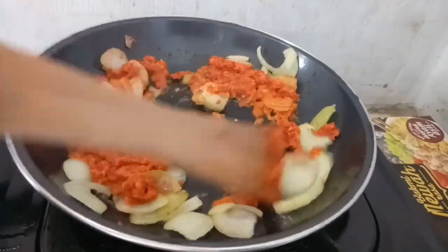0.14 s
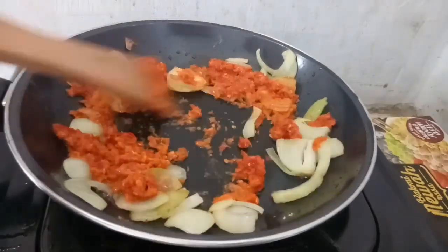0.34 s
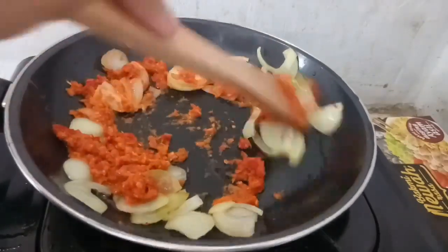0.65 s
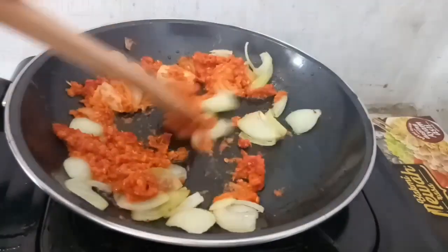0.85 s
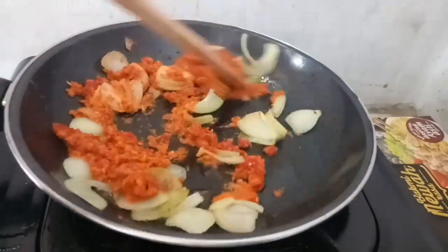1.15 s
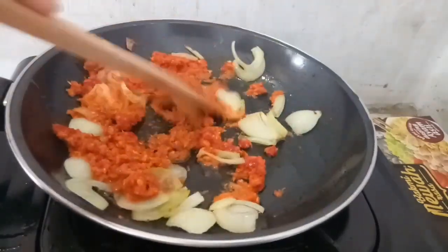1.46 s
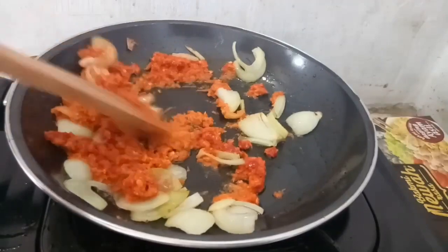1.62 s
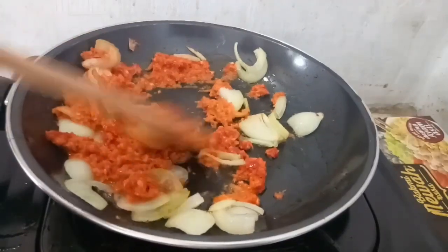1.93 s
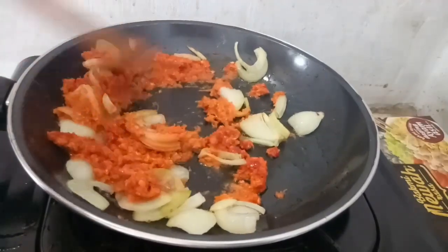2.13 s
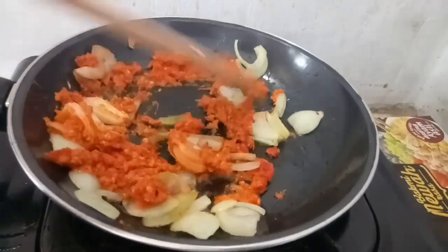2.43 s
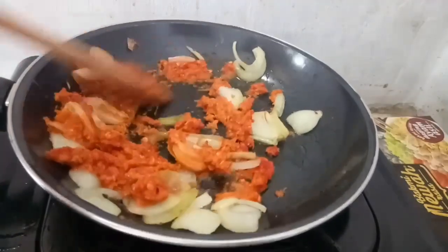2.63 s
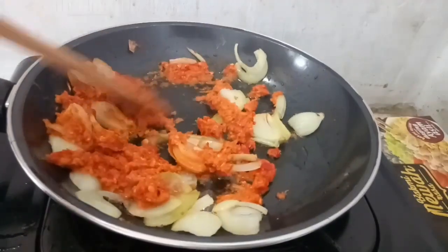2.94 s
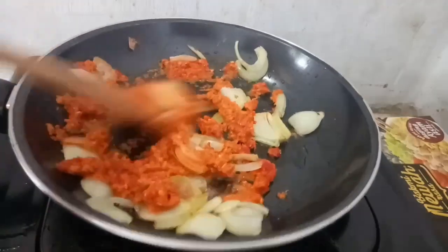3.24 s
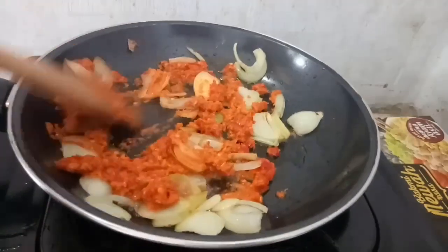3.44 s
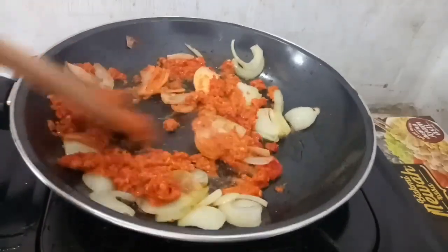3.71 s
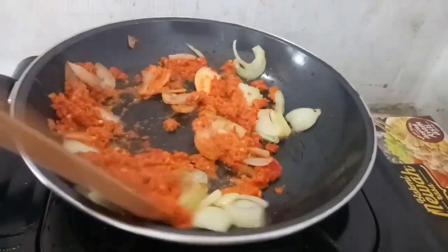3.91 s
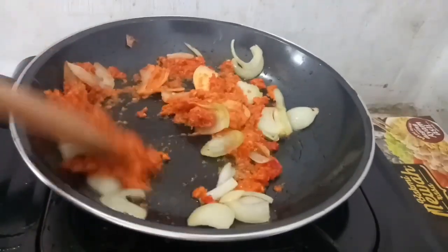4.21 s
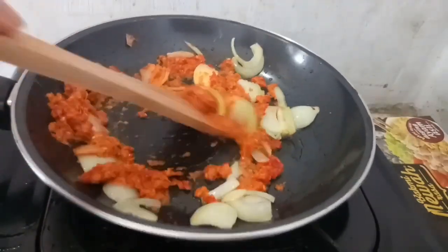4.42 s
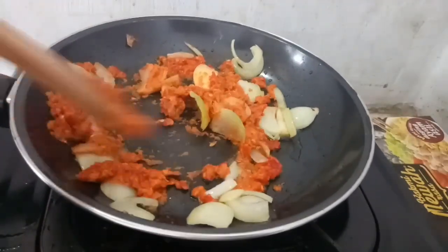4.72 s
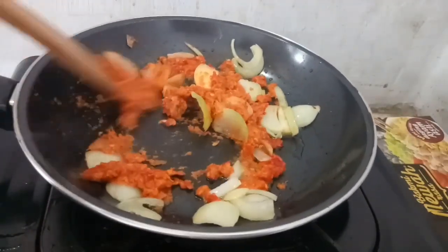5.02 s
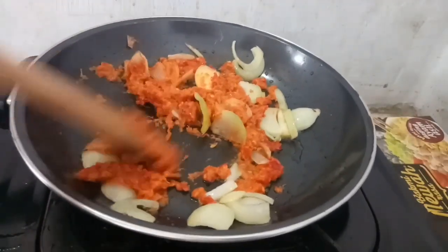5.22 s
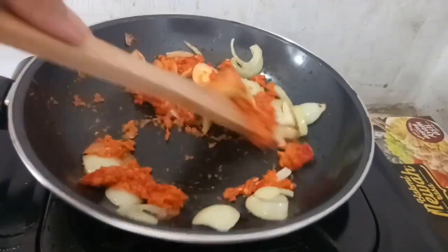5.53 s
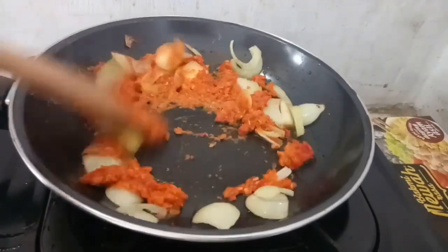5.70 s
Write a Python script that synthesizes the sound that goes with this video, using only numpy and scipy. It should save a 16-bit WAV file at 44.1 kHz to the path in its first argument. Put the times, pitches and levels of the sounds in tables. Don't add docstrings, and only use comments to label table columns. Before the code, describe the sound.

Close to a phone in a small hard-walled kitchen, a wooden spatula stirs chopped vegetables in a metal pan. Irregular sharp knocks, some with tiny bounces, set the pan chattering with a short damped ring. Wet scrapes fill the gaps over continuous sizzle, spitting oil and low burner roar. The left channel is louder.

```python
import sys
import numpy as np
from scipy import signal
from scipy.fft import rfft, irfft, next_fast_len
from scipy.io import wavfile
from scipy.ndimage import uniform_filter1d

SR = 44100
rng = np.random.default_rng(int(sys.argv[2]) if len(sys.argv) > 2 else 0)


def invert_db(level):
    return 10 ** (np.asarray(level, dtype=float) / 20)


def wrap_up_sound(samples):
    columns = np.atleast_2d(samples).T
    tamed = np.clip(columns, -1, 1)
    steps = np.round(tamed * 32767).astype(np.int16)
    wavfile.write(sys.argv[1], SR, steps)


N = 258426
T = np.arange(N) / SR

# start in seconds, tick peak in dB, tick pitch in Hz,
# pan bottom level in dB, chatter in seconds.
EDGE_BLOWS = [(0.351, -11, 1840, -25.5, 0.039), (0.8235, -10.5, 1830, -27, 0.068),
              (1.2478, -10, 1790, -26.5, 0.072), (2.2377, -22, 1770, -35.5, 0.03),
              (2.6406, -8.5, 1750, -27.5, 0.075), (3.3556, -9.5, 1830, -27.5, 0.07),
              (3.7399, -8.5, 1763, -25.5, 0.065), (4.1267, -10, 1730, -27.5, 0.058),
              (4.5389, -11.5, 1680, -26, 0.054), (5.0742, -13, 1710, -25.5, 0.021),
              (5.6499, -12, 1750, -26.5, 0.054)]
CORNER_BLOWS = [
    (0.2025, -8, 2293, -29.5, 0.073),
    (3.26, -17.5, 2240, -29, 0.0084),
    (3.6586, -21, 2300, -29, 0.003),
    (4.073, -10, 2260, -27.5, 0.06),
    (5.5665, -20, 2260, -34, 0.018),
]
# start in seconds, tick peak in dB, tick pitch in Hz.
BOUNCES = [(0.2484, -26, 1940), (0.3967, -26, 1866), (0.861, -19, 1830), (1.2987, -23, 1830),
           (2.682, -30, 1790), (3.3946, -20, 1830), (3.782, -29, 1740), (3.805, -25, 1830),
           (4.1685, -41, 1750), (5.1, -25, 1670), (5.576, -26, 1960), (5.687, -21.5, 1800),
           (0.214, -23, 2020), (.375, -25, 1860), (.845, -28, 1830), (.885, -25, 1830), (1.272, -24, 1790),
           (1.306, -26, 1830), (1.323, -27.5, 1830), (2.666, -26, 1760), (3.272, -28, 1930),
           (3.37, -26, 1830), (3.415, -22.5, 1830), (3.438, -30, 1830), (3.765, -31, 1750),
           (4.09, -23, 1950), (4.145, -26, 1780), (4.565, -26, 1730), (4.59, -39, 1730), (5.665, -29, 1740),
           (5.705, -31, 1780)]
# start in seconds, peak in dB, pitch in Hz, pan rim level in dB,
# chatter in seconds.
NUDGES = [(0.055, -41.5, 210, -66, 0.012), (0.171, -23.5, 277, -66, 0.053), (0.179, -29, 343, -66, 0.12),
          (0.698, -44.5, 240, -64, 0.017), (2.381, -41, 354, -58, 0.016), (2.454, -33, 227, -64, 0.018),
          (2.621, -26, 347, -53, 0.039), (3.497, -27, 332, -48, 0.017), (4.2306, -20, 576, -41.5, 0.014),
          (5.375, -39.5, 640, -46.5, 0.036), (5.5, -44, 352, -53, 0.028)]
# multiple of the tick pitch, level in dB.
EDGE_WOOD = [(1.004, 4.5), (.6, -11), (1.27, -12.5), (1.6, -8.5), (1.85, -7.5), (2.2, -6.5)]
# multiple of the tick pitch, level in dB.
CORNER_WOOD = [(1, 8), (.52, -6), (.76, -1), (1.27, -2.5), (1.47, -9.5)]
# pitch in Hz, level in dB, decay by 60 dB in seconds.
BOTTOM_MODES = [(235.3, 1.5, 0.52), (275.4, 2, 0.37), (347, 0, 0.19), (407, 5, 0.32), (421.2, -9, 1),
                (469.5, -1.5, 0.21), (576, -0.5, 0.25), (660.5, 1, 0.26), (719, -3, 0.37),
                (790, -17.5, 0.56), (897, -14, 0.63)]
# pitch in Hz, level in dB, decay by 60 dB in seconds.
RIM_MODES = [(1283, -18, 0.22), (1295, 2, 0.062), (1530, 0.5, 0.19), (1673, 4, 0.15), (1690, -24, 0.16),
             (1786, 3.5, 0.046), (1830, -4, 0.16), (1866, 7.5, 0.056), (1950, 3.5, 0.028), (2180, 2, 0.41),
             (2395, 2.5, 0.12), (2877, 1, 0.11), (3340, -2, 0.13), (3600, -26, 0.091)]
# frequency in Hz, level in dB.
CONTACT_COLOUR = [(100, -40), (170, -13), (210, 0), (300, 0), (4300, 0), (6800, -4), (8000, -16),
                  (10000, -36)]

# middle in seconds, half length in seconds,
# slip level in dB, load level in dB.
STROKES = [(0.07, 0.15, -82, -40.5), (0.34, 0.04, -43, -38.5), (0.66, 0.049, -74, -57),
           (1.132, 0.027, -74, -63), (1.452, 0.086, -56, -50), (1.79, 0.16, -71, -46.5),
           (2.01, 0.088, -70, -63), (2.46, 0.07, -43.5, -46), (2.85, 0.12, -43.5, -55),
           (3.015, 0.088, -83, -52.5), (3.273, 0.052, -50, -54), (3.582, 0.1, -51, -51.5),
           (3.66, 0.02, -49, -46), (4.19, 0.28, -51, -53), (4.48, 0.046, -48, -45.5),
           (5.26, 0.18, -47, -58.5), (5.556, 0.034, -39, -48), (5.825, 0.062, -44.5, -51)]
# middle in seconds, half length in seconds,
# change of resting level in dB, further change of the lows in dB.
LIFTS = [
    (0.064, .1, -5.5, -3),
    (.68, 0.08, 3, -1),
    (1.145, .07, 0, -3),
    (2.153, 0.071, 1, -5),
    (3.204, 0.062, 5, -11),
    (4.003, 0.052, -3, 2),
    (4.926, 0.26, 3, -11),
    (5.296, 0.054, -2, 1),
]
# frequency in Hz, level in dB.
SLIP_COLOUR = [(310, -7.5), (520, -0.5), (708, -4), (767, 0), (1020, 1.5), (1330, -14), (2300, -1),
               (3000, -2), (3900, -0.5), (6600, -120)]
# frequency in Hz, level in dB.
DRAG_COLOUR = [(100, -41), (170, -4), (238, -9.5), (296, -22), (351, -10), (467, -25), (650, -22),
               (840, -60), (1430, -120)]

# time in seconds, sizzle level in dB.
HEAT = [(0, -45.5), (.3, -40), (.6, -44), (1.04, -44.5), (1.4, -46.5), (1.8, -44.5), (2.2, -44),
        (2.5, -38.5), (2.8, -42), (3.2, -40), (3.55, -41.5), (4.35, -41.5), (4.65, -41), (5.2, -42.5),
        (5.45, -41.5), (5.53, -34.5), (5.62, -33), (5.7, -43)]
# middle in seconds, rise in dB,
# half width in seconds.
PUFFS = [(.18, 3.5, 0.024), (.36, 7, 0.11), (.77, 7, 0.05), (.93, 3.5, 0.04), (1.19, 6, 0.014),
         (1.389, 6, 0.009), (1.58, 6.5, 0.55), (1.81, -0.5, 0.023), (1.94, 1.5, 0.014), (2.08, -0.5, 0.021),
         (2.75, 1, 0.18), (3.2, 6.5, 0.037), (3.36, 12, 0.0034), (3.45, 1.5, 0.05), (3.69, 9, 0.051),
         (3.83, 5.5, 0.072), (4.18, 9, 0.11), (4.3, 3, 0.041), (4.44, 6.5, 0.086), (4.63, 8, 0.016),
         (4.81, 1, 0.02), (4.96, 1.5, 0.018), (5.2, 1.5, 0.036), (5.34, 6, 0.019), (5.48, 2.5, 0.032),
         (5.6, 1, 0.053), (5.85, 5, 0.12)]
# start in seconds, peak in dB, pitch in Hz.
SPITS = [(0.0064, -33, 4100), (0.13, -33, 3770), (0.184, -27, 3960), (0.6065, -24.5, 3900),
         (0.6659, -33, 4850), (0.773, -26.5, 4000), (0.9508, -29, 4480), (1.0384, -32, 4550),
         (1.38, -30.5, 4000), (1.449, -37, 4300), (1.4658, -33.5, 3940), (1.489, -29.5, 3980),
         (1.534, -28, 3840), (1.552, -36, 4190), (1.6113, -26.5, 4100), (1.6555, -28.5, 3960),
         (1.679, -29.5, 4010), (1.692, -35, 3770), (1.7084, -34, 3920), (1.7548, -38, 3990),
         (1.7943, -37, 4410), (1.8054, -34, 4020), (1.8204, -25.5, 4160), (1.851, -31, 3970),
         (1.9018, -29, 4000), (1.9628, -30, 4130), (2.0342, -29, 4000), (2.0464, -34, 4040),
         (2.0698, -28, 3970), (2.1423, -35, 4030), (2.2532, -20, 3840), (2.398, -31, 3990),
         (2.4764, -34, 4270), (2.4941, -33, 3940), (2.785, -29, 4010), (2.846, -34, 3950),
         (3.1026, -33, 4200), (3.1217, -30.5, 4050), (3.1797, -28, 3390), (3.467, -27, 3800),
         (3.4732, -25, 3180), (3.486, -25.5, 4000), (3.4974, -27, 4110), (3.5787, -30, 3860),
         (3.643, -25, 3960), (4.0525, -25, 4100), (4.282, -26, 4000), (4.3834, -29, 4120),
         (4.4217, -30.5, 4200), (4.6763, -28, 3940), (4.841, -26.5, 4440), (4.9112, -33, 3980),
         (4.9954, -28, 3860), (5.3356, -31, 4070), (5.4589, -30, 4060), (5.481, -26, 4030),
         (5.5192, -27, 4050), (5.7891, -27, 3580), (5.8405, -32, 3920)]
# frequency in Hz, level in dB.
SIZZLE_COLOUR = [(880, -22.5), (1500, -7), (1560, -15), (1910, -7.5), (2350, -7), (2880, -8.5),
                 (3060, -4.5), (3220, -3.5), (3630, -5.5), (3850, -2), (4020, 3), (4250, -2), (4620, -4),
                 (5050, -5), (9000, -33.5), (11700, -45), (19800, -120)]
# frequency in Hz, level in dB.
STEAM_COLOUR = [(3820, -5.5), (6500, 5), (6700, 4), (7890, -6.5), (8820, -8), (15000, -7.5), (15800, -15)]

# time in seconds, flame level in dB.
FLAME = [(0.0, -39.5), (1.83, -43.5), (1.86, -39), (3.23, -44), (3.46, -36.5), (3.65, -47.5), (3.69, -39),
         (3.88, -39.5), (4.06, -57), (4.11, -41.5), (4.55, -48), (4.77, -40), (4.91, -46.5), (5.11, -37),
         (5.34, -50.5), (5.63, -43), (5.83, -48), (5.86, -71)]
# frequency in Hz, level in dB.
BURNER_COLOUR = [(12, -59), (20, -18), (32, -21), (59, -12), (76, -5.5), (94, 3.5), (107, 2.5), (118, 0.5),
                 (141, -6.5), (189, -13.5), (206, -19.5), (230, -16), (300, -28), (510, -120)]
# frequency in Hz, left minus right in dB.
PORTS = [(60, 9.5), (110, 9.5), (200, 11), (380, 9.5), (700, 6.5), (1290, 7.5), (2380, 7.5), (4400, 3.5),
         (8120, 5), (15000, 2.5)]
# frequency in Hz, level in dB.
TOP_CUT = [(15500, 0), (15800, -60)]


def level(x, db):
    return x * invert_db(db) / np.sqrt(np.mean(x ** 2))


def shape(x, table):
    size = next_fast_len(x.shape[-1])
    hz, db = np.transpose(table)
    f = np.maximum(np.fft.rfftfreq(size, 1 / SR), 1)
    gain = invert_db(np.interp(np.log(f), np.log(hz), db))
    return irfft(rfft(x, size) * gain, size)[..., :x.shape[-1]]


def ring(x, hz, t60):
    r = np.exp(-np.log(1000) / (t60 * SR))
    w = 2 * np.pi * hz / SR
    return signal.lfilter([0, np.sin(w)], [1, -2 * r * np.cos(w), r * r], x)


def walk(rate, rows=1):
    k = int(SR / rate)
    held = np.repeat(rng.standard_normal((rows, N // k + 1)), k, axis=1)
    return 1.3 * uniform_filter1d(uniform_filter1d(held, k), k)[:, :N]


def clicks(size, rate, spread_db):
    chance, sign, size_draw = rng.random((3,) + size)
    height = invert_db(spread_db * np.minimum(-np.log(1 - size_draw), 4.5))
    return (chance < rate / SR) * np.sign(sign - .5) * height


def pair(make, like):
    like = np.clip(like, 0, 1)
    shared, left, right = make
    return np.sqrt(like) * shared + np.sqrt(1 - like) * np.array([left, right])


def add(out, x, s):
    i = int(s * SR)
    out[..., i:i + x.shape[-1]] += x[..., :N - i]


def bump(s, width):
    return np.exp(-((T - s) / width) ** 2)


def tick(wood, db, hz, push, crack_db):
    t = T[:1200]
    body = sum(invert_db(g) * np.sin(2 * np.pi * k * hz * t) for k, g in wood)
    body = body * (1 - np.exp(-t / 0.00064)) * np.exp(-(t / push) ** 2)
    snap = rng.standard_normal(len(t)) * np.exp(-t / 0.0025)
    crack = ring(snap, 3600, .002) + invert_db(-5) * ring(snap, 6500, .003)
    return invert_db(db) * (body / np.abs(body).max() + invert_db(crack_db) * crack / np.abs(crack).max())


def pan(modes, db, hold, rise, loose_db, like, free, first_blow=0, near_hz=None):
    t = T[:13000]
    force = (1 - np.exp(-t / rise)) / (1 + np.exp((t - hold) / 0.017))
    chatter = pair(force * clicks((3, len(t)), 1600, 2.2), like)
    chatter[:, :40] += first_blow * np.hanning(40)
    stray = rng.standard_normal((len(modes), 2)) * [2.0, .006]
    loud = slice(0, int((abs(hold) + .02) * SR))
    rung = 0
    for (f, g, t60), (stray_db, detune) in zip(modes, stray):
        favour_db = 0 if near_hz is None else -16 * abs(np.log2(f / near_hz))
        mode = ring(chatter, f * (1 + detune), free * t60)
        rung = rung + invert_db(g + stray_db + favour_db) * mode / mode[:, loud].std()
    band = [modes[0][0] * .9, modes[-1][0] * 1.15]
    rattle = signal.lfilter(*signal.butter(2, band, "band", fs=SR), chatter)
    return invert_db(db) * (rung / rung[:, loud].std() + invert_db(loose_db) * rattle / rattle[:, loud].std())


def spatula():
    ticks, metal = np.zeros((2, 2, N))
    strikers = ((EDGE_BLOWS, EDGE_WOOD, -5, .38), (CORNER_BLOWS, CORNER_WOOD, -5.5, .25))
    for blows, wood, rim_db, free in strikers:
        for s, db, hz, bottom_db, hold in blows:
            add(ticks, tick(wood, db - 4.0, hz, 0.0048, -6), s - .0006)
            bottom = pan(BOTTOM_MODES, bottom_db, hold, 0.0033, -11.5, 0.78, free)
            rim = pan(RIM_MODES, bottom_db + rim_db, hold, 0.00016, -7, 0.52, 0.43)
            add(metal, bottom + rim, s)
    for s, db, hz in BOUNCES:
        add(ticks, tick(EDGE_WOOD, db + 0.48, hz, 0.0062, -8), s - .0007)
    for s, db, hz, rim_db, hold in NUDGES:
        bottom = pan(BOTTOM_MODES, db - 6.5, hold, 0.0013, -16, 0.95, 0.43, 0.22, hz)
        rim = pan(RIM_MODES, rim_db, hold, 0.0014, -25, 0.44, 0.18)
        add(metal, bottom + rim, s)
    return shape(ticks + kitchen(metal + 0.54 * ticks, -7.0, 0.44), CONTACT_COLOUR)


def stirring():
    rest_slip_db, rest_load_db = -47, -69.5
    slide_lag_s, slide_s, slide_db = 0.037, 0.051, -21.5
    slide = sum(invert_db(db) * bump(s + hold + slide_lag_s, slide_s) for s, _, _, db, hold in EDGE_BLOWS)
    lifted = invert_db(sum(db * bump(s, w) for s, w, db, _ in LIFTS))
    hush = invert_db(sum(db * bump(s, w) for s, w, _, db in LIFTS))
    slip_strokes = sum(invert_db(db) * bump(s, w) for s, w, db, _ in STROKES)
    load_strokes = sum(invert_db(db) * bump(s, w) for s, w, _, db in STROKES)
    slip = invert_db(rest_slip_db) * lifted + invert_db(slide_db) * slide + slip_strokes
    load = invert_db(rest_load_db) * lifted + load_strokes
    return slip, load, hush


def scraping(slip, load, hush):
    slips = pair(clicks((3, N), 2500, 2.4) * invert_db(1.4 * walk(17)), 0.6)
    drag = pair(rng.standard_normal((3, N)) * invert_db(2.2 * walk(7.1)), 0.67)
    both = level(shape(slips, SLIP_COLOUR), -5.5) * slip + level(shape(drag, DRAG_COLOUR), -2.5) * load
    lows = shape(both, [(700, -2.5), (900, -40)])
    return both + (hush - 1) * lows


def frying():
    start_db, grows_db_per_s, steam_per_heat = -67, 0.9, 0.42
    fizz_per_puff = 0.59
    heat = np.interp(T, *np.transpose(HEAT))
    puffs = sum(db * bump(s, width) for s, db, width in PUFFS)
    steam = start_db + grows_db_per_s * T + steam_per_heat * (heat - heat.mean()) + puffs
    return heat + fizz_per_puff * (puffs - puffs.mean()), steam


def spit(db, hz):
    t = T[:900]
    burst = np.exp(-t / .001) + .35 * np.exp(-t / .0035)
    puff = pair(rng.standard_normal((3, len(t))) * burst, .7)
    sharp = np.diff(puff, prepend=0)
    x = ring(sharp, hz, .007)
    for multiple, t60 in ((.75, .003), (1.25, .004), (.53, .004)):
        x = x + .6 * ring(sharp, multiple * hz, t60)
    x = signal.sosfilt(signal.butter(4, [1400, 5600], "band", fs=SR, output="sos"), x)
    return invert_db(db + 2.5) * x / np.abs(x.mean(axis=0)).max()


def oil(sizzle_db, steam_db):
    decay = np.exp(-T[:900] / .002)[None]
    bursts = signal.fftconvolve(np.abs(clicks((1, N), 600, 3.5)), decay, axes=1)[:, :N]
    busy = 1 + .55 * bursts / bursts.std()
    fizz = shape(pair(busy * rng.standard_normal((3, N)), 0.13), SIZZLE_COLOUR) * invert_db(0.93 * walk(19))
    hiss = pair((10.0 + busy) * rng.standard_normal((3, N)), 0.043)
    hiss = shape(hiss, STEAM_COLOUR) * invert_db(1.6 * walk(11))
    out = level(fizz, 0.74) * invert_db(sizzle_db) + level(hiss, 6.6) * invert_db(steam_db)
    for s, db, hz in SPITS:
        add(out, spit(db, hz), s - .0006)
    return out


def burner(db):
    roar = shape(pair(rng.standard_normal((3, N)), 0.92), BURNER_COLOUR)
    flutter = np.sqrt(uniform_filter1d(roar.mean(axis=0) ** 2, 3000))
    return level(roar / flutter ** 0.11, 0.1) * invert_db(db)


def kitchen(x, wet_db, t60):
    t = T[:16000]
    tail = rng.standard_normal((2, len(t))) * np.exp(-np.log(1000) * t / t60) * (t > .004)
    tail[1] += uniform_filter1d(tail[0] - tail[1], 60)
    tail -= .75 * uniform_filter1d(uniform_filter1d(tail, 30), 30)
    tail = tail / np.sqrt((tail ** 2).sum(axis=1, keepdims=True))
    return x + invert_db(wet_db) * signal.fftconvolve(x, tail, axes=1)[:, :N]


def scene():
    flame_db = np.interp(T, *np.transpose(FLAME))
    return spatula() + scraping(*stirring()) + oil(*frying()) + burner(flame_db + 0.2)


def band_limit(x):
    return signal.sosfilt(signal.butter(12, 15980, fs=SR, output="sos"), x)


def record(dry):
    left_lag_s = .0001
    hz, db = np.transpose(PORTS)
    mean = 20 * np.log10((invert_db(db / 2) + invert_db(-db / 2)) / 2)
    left = shape(dry[0], np.transpose([hz, db / 2 - mean]))
    right = shape(dry[1], np.transpose([hz, -db / 2 - mean]))
    left = np.roll(left, int(round(left_lag_s * SR)))
    both = np.tanh(1.362 * np.array([left, right])) / 1.21
    return band_limit(shape(both, TOP_CUT))


dry = scene()
out = record(dry)
wrap_up_sound(out)
```